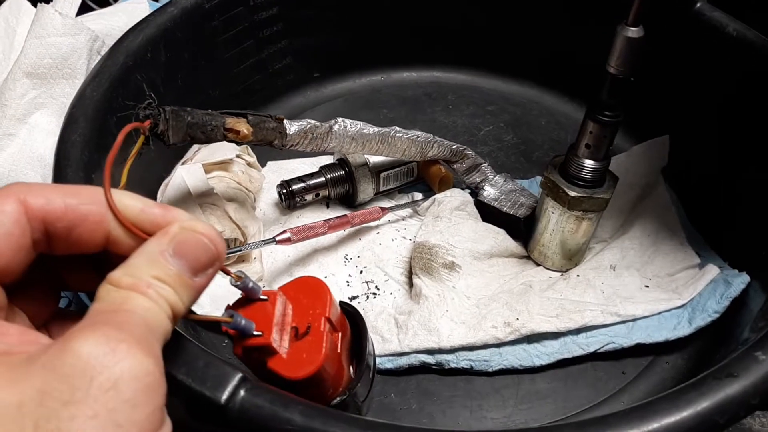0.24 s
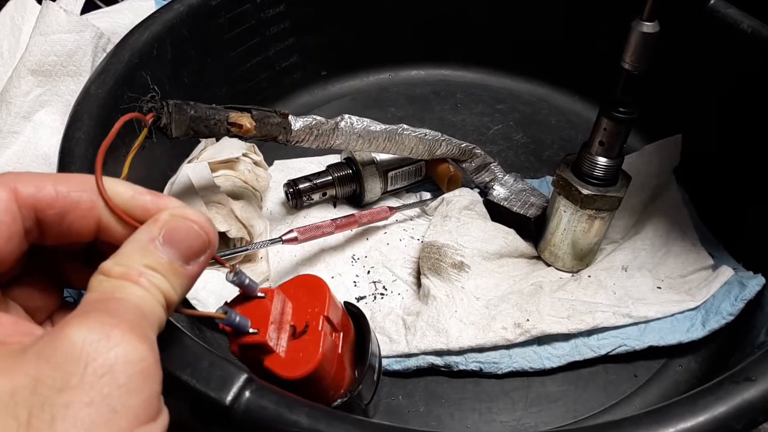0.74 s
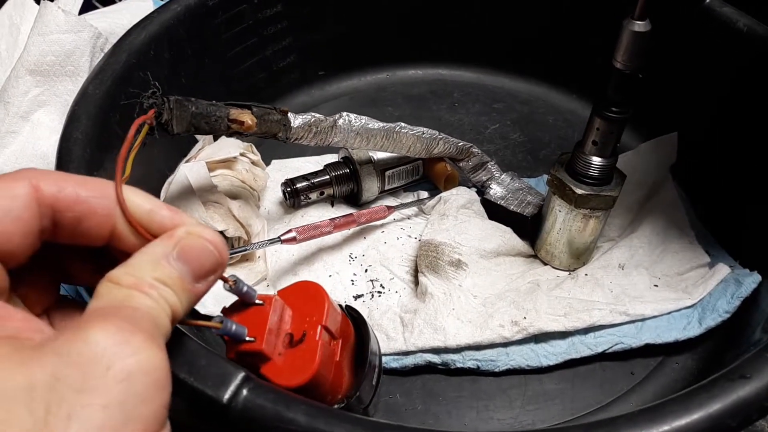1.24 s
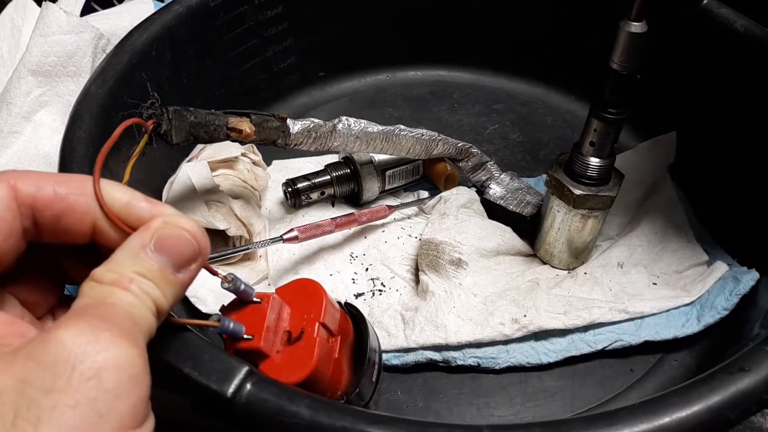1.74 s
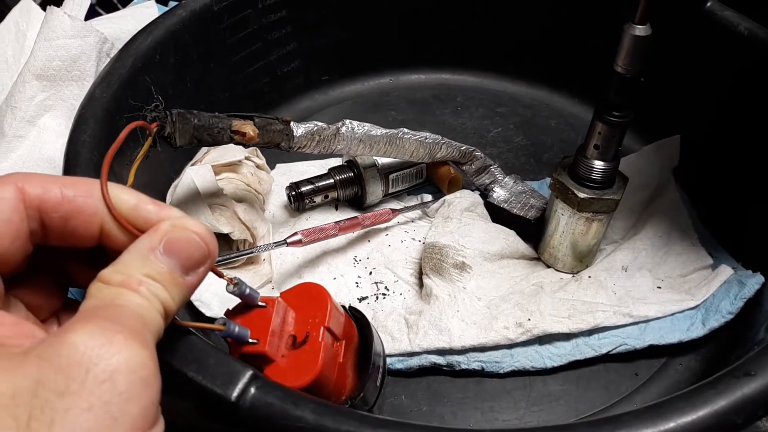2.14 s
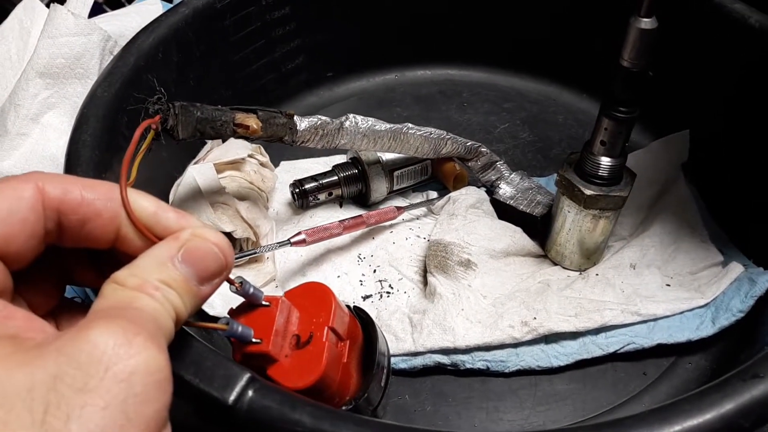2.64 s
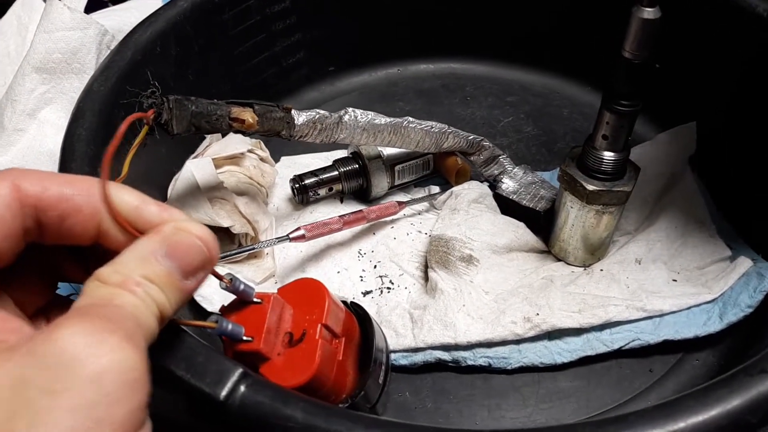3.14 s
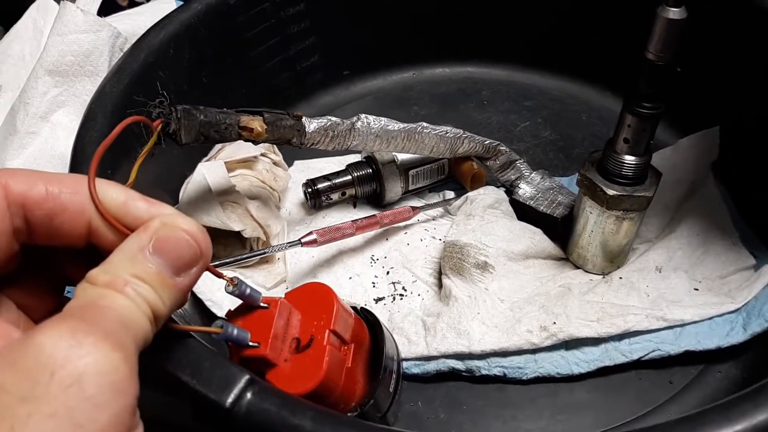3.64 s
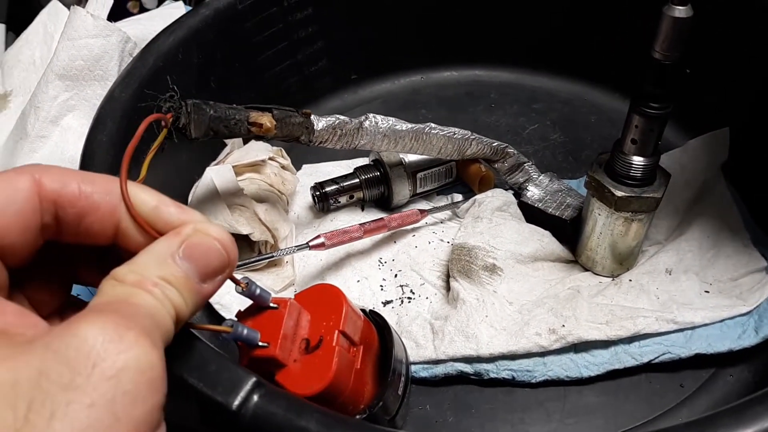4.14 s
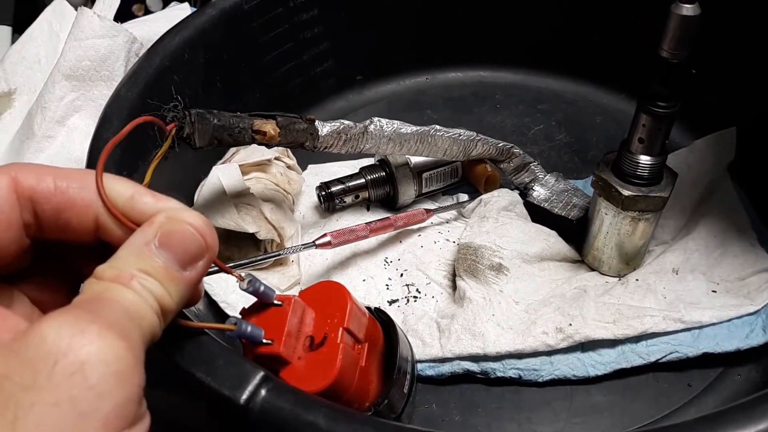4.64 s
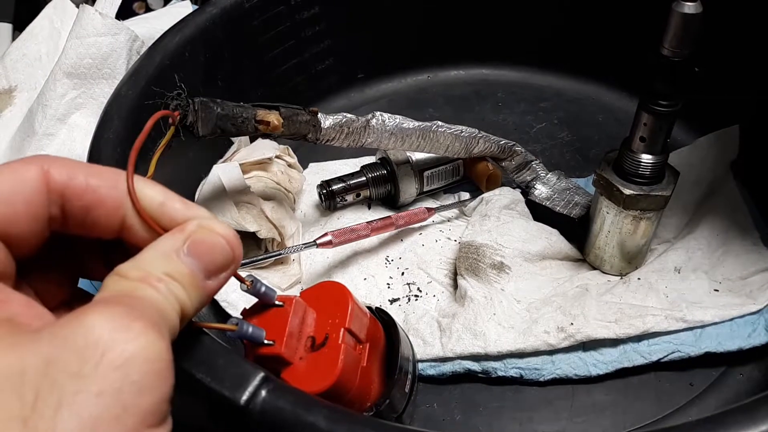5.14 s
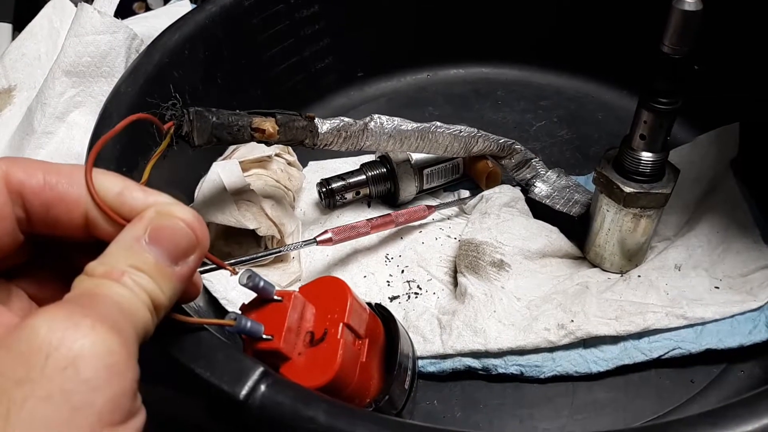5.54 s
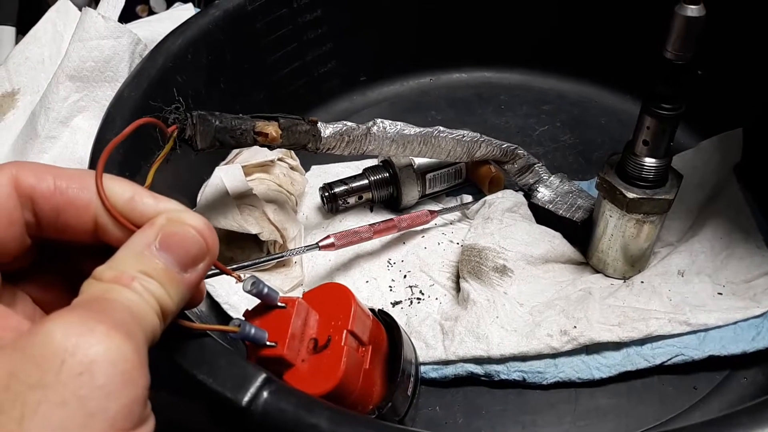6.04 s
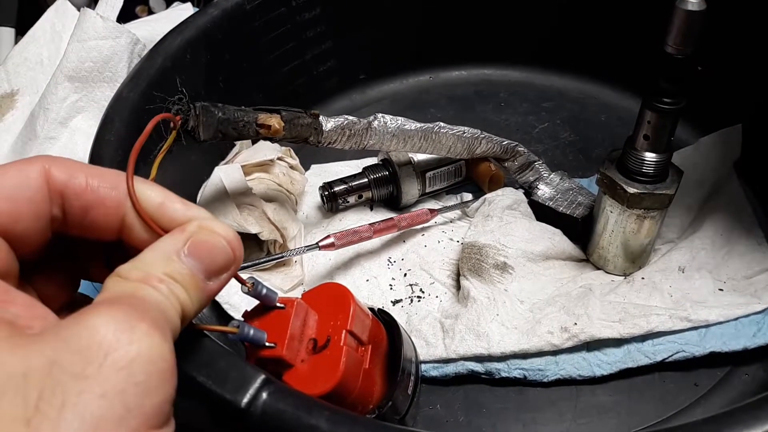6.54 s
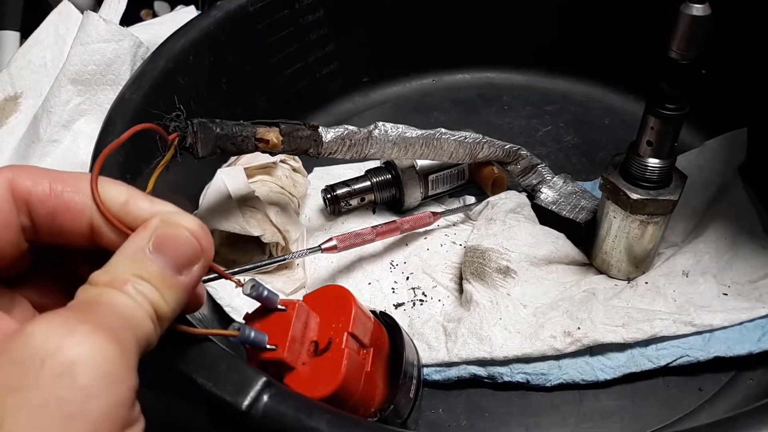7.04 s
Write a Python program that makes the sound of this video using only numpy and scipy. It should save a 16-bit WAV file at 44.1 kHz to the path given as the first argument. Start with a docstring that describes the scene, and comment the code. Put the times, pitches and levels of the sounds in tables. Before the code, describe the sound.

Hissing, spitting spray keeps getting cut off by a valve's sharp clicks, then surges back, with small sparks and knocks close by.

```python
"""A solenoid pressure valve, worked by hand with battery leads, sits in a plastic tub in a garage.
At first it sprays and spits. After about a second its plunger snaps shut and the spray stops dead,
while a faint leak hisses on. The flow creeps back as a thin jet, surges, and settles to a spitting spray.
It shuts four more times; along the way the leads spark and tick, the hand rumbles and the valve knocks
on the tub. The sound ends just after one last surge."""
import sys
import numpy as np
from scipy import signal
from scipy.fft import rfft, irfft, next_fast_len
from scipy.io import wavfile
from scipy.ndimage import uniform_filter1d

SR = 44100
rng = np.random.default_rng(int(sys.argv[2]) if len(sys.argv) > 2 else 0)


def master(y):
    """Save y as 16-bit WAV."""
    cut = np.clip(np.atleast_2d(y).T, -1, 1)
    pcm = np.round(cut * 32767)  # scale
    wavfile.write(sys.argv[1], SR, pcm.astype(np.int16))


N = 322371
TIME = np.arange(N) / SR
HIT_TIME = TIME[:8192]

# The plunger slams shut. Each row: start in seconds, level in dB.
SHUTS = [(1.1214, 2.5), (2.34, 3), (4.043, 3), (5.0949, 2.5), (6.3879, 2.5)]
# Spells of wet flow. Each row: surge time in seconds, surge level in dB, its fall in dB per second,
# spray delay in seconds, spray level in dB, extra level of the first gush in dB, spitting level in dB.
RUNS = [(-.4, 0, 380, .085, 1.5, 12, -0.15), (1.587, -2, 330, 0.067, 3.5, 10.5, 1.5),
        (3.236, -1, 380, 0.086, .5, 13, .5), (4.465, .5, 330, 0.08, 1, 15, 0),
        (5.427, 0, 400, 0.078, 0, 13, -1), (6.928, 1, 65, 0.13, 1.5, -2.5, -10)]
# The wet flow rings in a cavity. Each row: pitch and width in Hz, left and right boost in dB.
CAVITY_RINGS = [(412, 156, 5.5, 5), (861, 38, 4, 9), (1932, 180, 6, 5.5), (3060, 290, -3, -1),
                (3724, 270, 3, 6), (4030, 274, -2, -9), (4350, 213, -1.5, 8), (5620, 600, -2.5, -5),
                (6704, 170, -3, 7), (7234, 170, -8, 9.5), (7460, 150, -1, -0.5), (8410, 260, 2, -0.5),
                (12500, 400, -7, -4.5)]


def undb(db):
    """Turn decibels into a number to multiply by."""
    return 10 ** (np.asarray(db) / 20)


def fade(t, t60):
    """Die away, 60 dB down after t60 seconds."""
    return np.exp(-np.log(1000) * t / t60)


def rise(t, rise_s):
    """Climb smoothly from 0 at t = 0 to 1 at rise_s."""
    return np.sin(np.pi / 2 * np.clip(t / rise_s, 0, 1)) ** 2


def release(t, db_per_s):
    """Stay at full strength until t = 0, then fall steadily."""
    return undb(-db_per_s * np.maximum(t, 0))


def settle(t, settle_s):
    """Stay at 1 until t = 0, then ease toward 0."""
    return np.exp(-np.maximum(t, 0) / settle_s)


def bump(middle_s, length_s):
    """A rounded swell."""
    return np.cos(np.pi * np.clip((TIME - middle_s) / length_s, -.5, .5))


def wander(per_second):
    """Glide between random values, mostly within 1 of zero."""
    step = int(SR / per_second)
    return 1.33 * uniform_filter1d(np.repeat(rng.standard_normal(N // step + 1), step), step)[:N]


def add(track, start_s, sound):
    """Mix a sound into the track."""
    start = int(start_s * SR)
    track[:, start:start + sound.shape[1]] += sound[:, :N - start]


def colour(x, tone, rings=()):
    """Filter by a tone table. Each row: pitch in Hz, left and right level in dB. Rings add peaks or dips."""
    freq = np.maximum(np.arange(1025) * SR / 2048, 1)
    hz, *sides = np.transpose(tone)
    db = np.array([np.interp(np.log(freq), np.log(hz), side) for side in sides])
    for centre, width, *boost in rings:
        db = db + np.outer(boost, 1 / (1 + (2 * (freq - centre) / width) ** 2))
    # fold the filter so that it rings only after a sound, never before
    cepstrum = irfft(np.log(undb(db)))
    half = len(freq) - 1
    cepstrum[:, 1:half] *= 2
    cepstrum[:, half + 1:] = 0
    response = irfft(np.exp(rfft(cepstrum)))
    return signal.oaconvolve(x, response, axes=1)[:, :x.shape[1]]


def noise_pair(size, shared, lag=0):
    """Left and right noise; the part they share reaches the left lag samples later."""
    common = rng.standard_normal(size)
    separate = rng.standard_normal((2, size))
    return np.sqrt(shared) * np.array([np.roll(common, lag), common]) + np.sqrt(1 - shared) * separate


def unit_energy(x):
    """Scale each side to an energy of 1."""
    return x / np.sqrt(np.sum(x ** 2, axis=1, keepdims=True))


def hiss(tone, shared, rings=(), flutter_db=.6):
    """Rushing noise that flutters in strength; its tone levels count as dB per Hz."""
    turbulence = noise_pair(N, shared, lag=21) * np.sqrt(SR / 2) * undb(flutter_db * wander(60))
    return colour(turbulence, tone, rings)


def crack(tone, rise_s, t60, bounce_s, bounce_db, lag=0):
    """Two parts meet: a short burst and one bounce."""
    strike = (1 - np.exp(-HIT_TIME / rise_s)) * fade(HIT_TIME, t60)
    after = np.maximum(HIT_TIME - bounce_s, 0)
    bounce = undb(bounce_db) * (after > 0) * fade(after, t60)
    burst = noise_pair(len(HIT_TIME), 0.42, lag) * (strike + bounce)
    return colour(unit_energy(burst), tone)


def small_source(x, cutoff_hz=185):
    """Small things give off little bass."""
    return signal.sosfilt(signal.butter(4, cutoff_hz, "high", fs=SR, output="sos"), x)


def garage(x, t60=0.28, build_s=0.00095):
    """The garage sends back a wash of echoes just after the direct sound."""
    # The share that comes back. Each row: pitch in Hz, left and right level in dB.
    room_tone = [(100.4, -13, -10.5), (388, -11.5, -12), (1950, -8, -8), (4300, -13, -18.5),
                 (8000, -12.5, -21.5), (16000, -10, -19.5)]
    t = TIME[:SR * 3 // 4]
    tail = unit_energy(rng.standard_normal((2, len(t))) * fade(t, t60) * (1 - np.exp(-t / build_s)))
    size = next_fast_len(N + SR, real=True)
    echoes = irfft(rfft(x, size) * rfft(tail, size), size)[:, :N]
    return colour(echoes, room_tone)


def tub_walls(x, gap_s=.0015, echo_db=-12):
    """The close walls add quick echoes that make the hiss hollow."""
    scatter = rng.standard_normal((2, len(HIT_TIME))) * fade(HIT_TIME, t60=.04) * (HIT_TIME > gap_s)
    return x + signal.oaconvolve(x, undb(echo_db) * unit_energy(scatter), axes=1)[:, :N]


def leak():
    """A faint leak hisses the whole time."""
    # Each row: pitch in Hz, left and right level in dB per Hz.
    leak_tone = [(25.2, -122, -122), (84, -100, -102), (294, -100, -102), (700, -113, -112),
                 (1290, -104, -111), (2510, -102, -111), (4500, -94.5, -100), (6500, -102, -90),
                 (7330, -115, -95), (8800, -109, -100), (11200, -107, -92), (13500, -108, -92.5),
                 (16000, -113, -92.5)]
    return hiss(leak_tone, shared=0.41)


def hand():
    """Each shift of the grip rumbles softly through the tub."""
    # Each row: middle and length in seconds, level in dB.
    grips = [(1.217, 0.26, -2), (1.456, 0.31, 3.5), (2.47, 0.14, -2), (2.68, 0.24, -7), (3.186, 0.073, 11),
             (3.36, .12, 4.5), (4.149, 0.31, -6), (4.431, 0.16, -1.5), (6.49, 0.093, 1),
             (6.905, 0.068, 2.5)]
    # Each row: pitch in Hz, left and right level in dB per Hz.
    rumble_tone = [(25, -104, -104), (78, -88.5, -88), (222, -87.5, -86.5), (414, -83.5, -89.5),
                   (601, -106, -106), (1990, -125, -125)]
    swells = sum(undb(db) * bump(middle, length) for middle, length, db in grips)
    return swells * hiss(rumble_tone, shared=0.78, flutter_db=5)


def leads():
    """The leads touch the terminals: bright sparks, and duller ticks of metal on metal."""
    # Each row: start in seconds, level in dB.
    sparks = [(1.19, -4), (1.4804, -6), (1.5393, -6), (2.4336, -18.5), (3.1906, -4), (4.4314, -3),
              (5.3647, -15), (5.379, -4), (5.3936, -4), (6.8602, -2.5)]
    ticks = [(1.539, -15), (2.414, -24), (5.0232, -5), (5.1656, -5.5), (5.1757, -3), (5.1927, -15.5),
             (5.2115, -23), (5.261, -27), (5.3144, -18), (5.576, -11.5), (6.5936, -25.5)]
    # Each row: pitch in Hz, left and right level in dB.
    spark_tone = [(30, -32, -29.5), (200, -15, -13), (800, -15, -5), (2180, -9, -16), (3980, 7, 10.5),
                  (6000, -23, 4), (8500, -12.5, -4.5), (10500, -13, -1), (11800, 0.5, 18),
                  (13300, -0.5, 12.5), (15600, -12.5, 0.5)]
    tick_tone = [(30, -34.5, -31), (201, -6.5, -15), (600, -6.5, -8.5), (2000, -2, -9.5), (3000, 5.5, -6),
                 (3670, 8, 0), (4670, 12.5, -8), (7170, -9, -11), (9000, -15, -16), (13060, -9, -11),
                 (15700, -20, -22)]
    out = np.zeros((2, N))
    for start, db in sparks:
        add(out, start, undb(db) * crack(spark_tone, 0.00013, 0.01, 0.0014, bounce_db=-13, lag=21))
    for start, db in ticks:
        add(out, start, undb(db) * crack(tick_tone, 0.0001, 0.0095, 0.0011, bounce_db=-9, lag=-10))
    return out


def tub_knocks(swell_s=.0026, right_db=-5):
    """The valve hits the tub with a hard clack, and the soft plastic floor swings a few times. The faint knocks
    after 6 s are the hand bumping the tub."""
    # Each row: start in seconds, clack and thump level in dB, thump pitch in Hz.
    knocks = [(1.6837, 3.5, -13.5, 436), (1.7267, -1.5, -9, 376), (2.432, -18.5, -41, 850),
              (2.5889, -5, -18, 398), (2.6066, -5, -34, 432), (3.338, -7, -31.5, 450),
              (3.6083, -8.5, -33, 467), (6.079, -27, -44, 200), (6.477, -34, -55, 302),
              (6.5, -39, -46, 260)]
    # Each row: pitch in Hz, left and right level in dB.
    clack_tone = [(30, -27.5, -31), (150.6, -15.5, -17), (884, 0, -15), (1680, -4.5, -12), (2890, 12, 0),
                  (3680, 3, -0.5), (4490, 16, 6.5), (6640, -6, -5), (10000, -7.5, -8.5), (16000, -27, -15)]
    out = np.zeros((2, N))
    swing = (HIT_TIME / swell_s * np.exp(1 - HIT_TIME / swell_s)) ** 2
    for start, clack_db, thump_db, hz in knocks:
        thump = np.outer(undb([thump_db, thump_db + right_db]), swing * np.sin(2 * np.pi * hz * HIT_TIME))
        clack = undb(clack_db) * crack(clack_tone, 0.00016, 0.012, 0.0019, bounce_db=-4)
        add(out, start, small_source(thump) + clack)
    return out


def plunger(travel_s=0.00127, click_db=-15):
    """The plunger lets go with a click, then hits its seat, rings the body and rattles the housing."""
    # Each row: pitch in Hz, seconds to fade by 60 dB, left and right level in dB.
    body_notes = [(167, 0.048, -37, -39.5), (377, 0.036, -26, -29.5), (615, 0.027, -40.5, -37.5),
                  (1330, 0.023, -39.5, -34.5), (2084, 0.039, -37, -42), (3710, 0.013, -27, -26),
                  (4570, 0.016, -41, -23.5), (6880, .018, -52, -35.5)]
    # Each row: pitch in Hz, left and right level in dB.
    shut_tone = [(30, -49, -42.5), (110, -33, -17), (220, -14, -8), (654, -0.5, -4.5), (850, -16, 1),
                 (1300, -9.5, -4.5), (3000, -1, -13.5), (4440, 4.5, 11), (4930, -9, -22), (6850, -31, -0.5),
                 (8700, -21, -18), (12300, -23, -6), (16200, -19, -6)]
    rattle_tone = [(100, -43, -45), (1600, -19, -22), (2320, 7.5, 0.5), (2940, -1.5, -9),
                   (4500, -14, -18.5), (16000, -41, -45)]
    out = np.zeros((2, N))
    ring = small_source(sum(np.outer(undb(sides), np.sin(2 * np.pi * hz * HIT_TIME) * fade(HIT_TIME, t60))
                            for hz, t60, *sides in body_notes))
    for start, db in SHUTS:
        click = crack(shut_tone, 0.00013, 0.013, 0.0008, bounce_db=-6)
        seat = crack(shut_tone, 0.00019, 0.01, 0.0013, bounce_db=-9.5, lag=10)
        rattle = crack(rattle_tone, 0.0011, 0.038, 0.007, bounce_db=-9.5)
        add(out, start - travel_s, undb(db + click_db) * click)
        add(out, start, undb(db) * (ring + seat + rattle))
    return out


def jet(hold_s=0.0072):
    """A thin dry jet creeps back, drifts in level and dies away once the next surge has come."""
    # Each row: start and rise in seconds, level in dB, drift in dB per second, midway swell in dB.
    jets = [(1.33, 0.024, 4, -27, -2.5), (2.51, .075, -2.5, -4, 3.5), (4.255, 0.043, -2.5, 3, 0),
            (5.299, 0.078, -1, -12, 0.5), (6.674, 0.034, 1, 15, -1)]
    # Each row: pitch in Hz, left and right level in dB per Hz.
    jet_tone = [(29.7, -116, -116), (200, -97.5, -96.5), (600, -93, -83.5), (804, -82, -83.5),
                (1500, -92.5, -86.5), (2740, -75.5, -87.5), (3850, -80, -74.5), (5100, -76.5, -75.5),
                (6950, -80, -67), (7720, -83, -77), (9070, -87.5, -75), (11530, -81.5, -67.5),
                (13100, -85.5, -68), (16000, -82.5, -76.5)]
    # Each row: pitch and width in Hz, left and right boost in dB.
    jet_rings = [(403, 110, 2.5, 5), (810, 110, 3, 6), (1250, 87, 0, 5), (4830, 240, 4.5, 6),
                 (5750, 400, -1.5, -4.5), (7150, 200, -3.5, 0), (8500, 900, 3.5, 0), (9350, 500, -8.5, 0),
                 (11100, 230, -2, 3.5)]
    gain = np.zeros(N)
    for start, rise_s, db, drift, swell_db in jets:
        length = min(run[0] for run in RUNS if run[0] > start) - start
        age = np.clip(TIME - start, 0, length)
        level = undb(db + drift * age + swell_db * np.sin(np.pi * age / length))
        gain += rise(age, rise_s) * level * release(TIME - start - length - hold_s, db_per_s=400)
    return gain * hiss(jet_tone, shared=0.34, rings=jet_rings)


def spitting(per_second=116, evenness=12, scatter_db=2.2, rebound_s=0.001295, rebound_db=-9):
    """Slugs of liquid pop out at nearly even gaps; each pop rebounds as a spatter and rings the cavity."""
    # Each row: pitch in Hz, left and right level in dB per Hz.
    spit_tone = [(30.1, -114, -114), (184, -97.5, -100.5), (398, -89, -89.5), (730, -90, -84.5),
                 (1318, -82, -82.5), (1450, -103, -99), (1812, -81.5, -79.5), (2400, -78.5, -94.5),
                 (3560, -82, -82.5), (4000, -78, -72), (4900, -94.5, -84), (8000, -104, -100),
                 (16300, -120, -115)]
    # The spitting falters. Each row: middle and length in seconds, dip in dB.
    falters = [(3.438, .2, -13.5)]
    times = np.cumsum(rng.gamma(evenness, 1 / (per_second * evenness), size=1200))
    sizes = undb(scatter_db * np.clip(rng.standard_normal(len(times)), -2, 2))
    inside = times < TIME[-1]
    pops = np.zeros(N)
    pops[(times[inside] * SR).astype(int)] = sizes[inside]
    pops *= np.sqrt(SR / 2 / np.mean(pops ** 2))  # a power of 1 per Hz
    spatter = np.sqrt(np.abs(uniform_filter1d(pops ** 2, size=44))) * noise_pair(N, shared=.3)
    rebound = undb(rebound_db) * np.roll(spatter, int(rebound_s * SR), axis=1)
    direct = np.array([np.roll(pops, 6), pops])  # the left hears it slightly later
    dip = undb(sum(db * bump(middle, length) ** 2 for middle, length, db in falters))
    return dip * colour(direct + rebound, spit_tone, CAVITY_RINGS)


def run_strengths():
    """The surge kicks and fades, spray and spitting gush and settle, and the next shut cuts them all."""
    surge_rise_s, surge_hold_s, kick_db, kick_s = 0.025, 0.055, 5, 0.013
    spray_rise_s, gush_s = 0.048, 0.041
    spit_lag_s, spit_rise_s, spit_gush_share = 0.012, 0.025, 0.38
    surge, spray, spit = np.zeros((3, N))
    for start, surge_db, fall, delay_s, spray_db, gush_db, spit_db in RUNS:
        flowing = TIME < min((shut for shut, _ in SHUTS if shut > start), default=np.inf)
        age = TIME - start
        surge_level = undb(surge_db + kick_db * settle(age, kick_s)) * release(age - surge_hold_s, fall)
        surge += flowing * rise(age + surge_rise_s, surge_rise_s) * surge_level
        spray_age = age - delay_s
        pressure = flowing * release(spray_age, db_per_s=1.4)
        spray_level = undb(spray_db + gush_db * settle(spray_age, gush_s))
        spray += pressure * rise(spray_age + spray_rise_s, spray_rise_s) * spray_level
        spit_age = spray_age - spit_lag_s
        spit_level = undb(spit_db + spit_gush_share * gush_db * settle(spit_age, gush_s))
        spit += pressure * rise(spit_age + spit_rise_s, spit_rise_s) * spit_level
    return surge, spray, spit


def shifting(x, start_s=2.6, length_s=0.86):
    """The wet flow rings harder at first, then less as the hand and the nearby phone shift."""
    # Each row: pitch and width in Hz, left and right boost in dB.
    early_rings = [(3970, 200, 5.5, -1), (5610, 450, 3.5, 6.5), (6760, 200, 3, 5.5), (8820, 440, 0, 1)]
    flat = [(20, 0, 0), (20000, 0, 0)]
    moved = rise(TIME - start_s, length_s)
    return moved * x + (1 - moved) * colour(x, flat, early_rings)


def wet_flow():
    """The passage fills with a bright surge, then sprays and spits until the valve shuts."""
    # Each row: pitch in Hz, left and right level in dB per Hz.
    surge_tone = [(30, -122, -122), (700, -133, -111), (1514, -94, -103.5), (3550, -71.5, -72),
                  (4190, -75, -64), (5000, -73.5, -72.5), (7200, -73.5, -70), (9500, -80.5, -63),
                  (10300, -78, -70.5), (11300, -75, -64), (13600, -77.5, -62.5), (14500, -81.5, -75),
                  (16100, -90, -86)]
    spray_tone = [(60, -125, -125), (400, -98, -96.5), (1163, -89.5, -87.5), (1400, -95.5, -90.5),
                  (1990, -83, -88), (2770, -88.5, -87), (4120, -78.5, -77.5), (5480, -90.5, -87.5),
                  (6940, -85.5, -80.5), (8720, -96.5, -79.5), (10450, -99.5, -91), (13400, -91.5, -75.5),
                  (14500, -106, -102), (16300, -112, -96)]
    surge_gain, spray_gain, spit_gain = run_strengths()
    surge = surge_gain * hiss(surge_tone, shared=0.49, rings=CAVITY_RINGS)
    spray = spray_gain * hiss(spray_tone, shared=0.43, rings=CAVITY_RINGS)
    return shifting(surge + spray + spit_gain * spitting())


def scene():
    """Hand, flow, valve, tub and leads, close up in the garage."""
    direct = hand() + tub_walls(jet() + wet_flow() + leak()) + plunger() + tub_knocks() + leads()
    return direct + garage(direct)


def record(dry):
    """The phone cuts the highest treble."""
    top_hz = 15900
    return signal.sosfilt(signal.ellip(10, .2, 80, top_hz, fs=SR, output="sos"), dry)


dry = scene()
out = record(dry)
master(out)
```